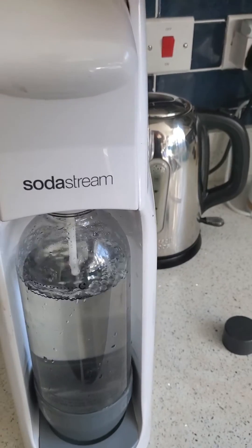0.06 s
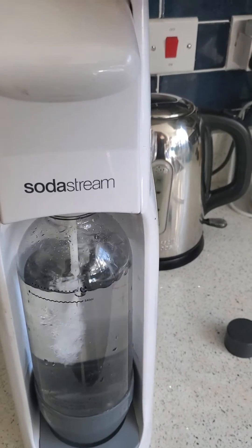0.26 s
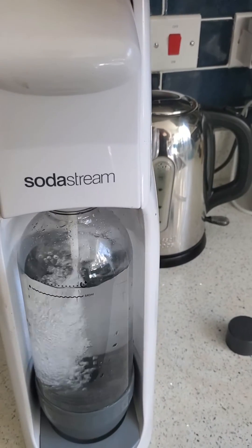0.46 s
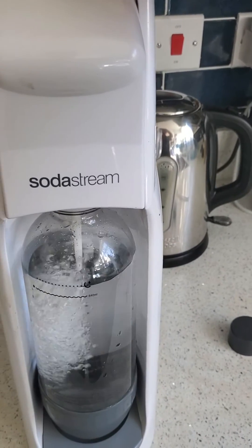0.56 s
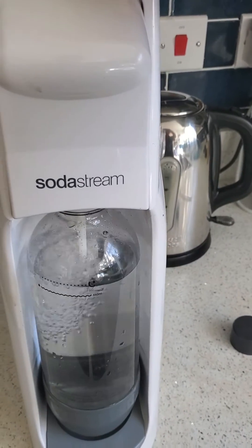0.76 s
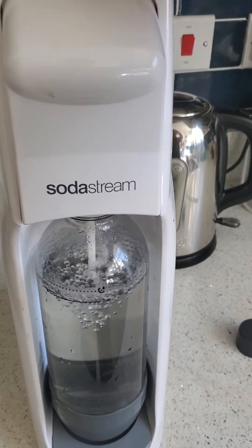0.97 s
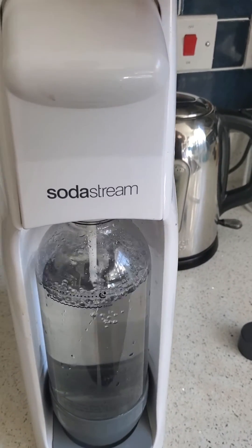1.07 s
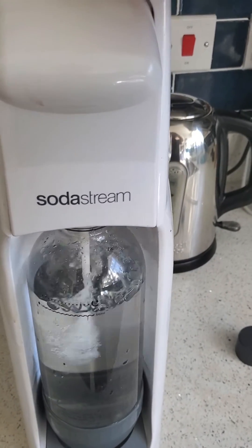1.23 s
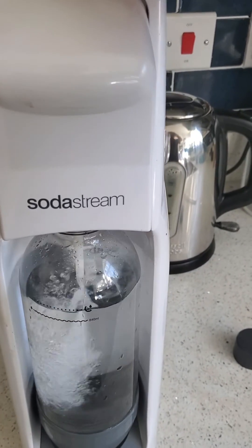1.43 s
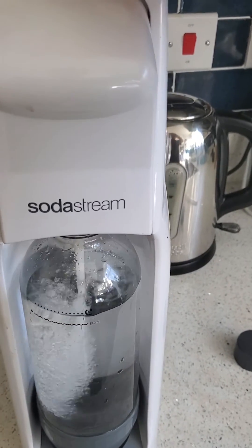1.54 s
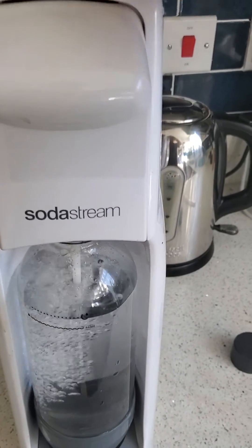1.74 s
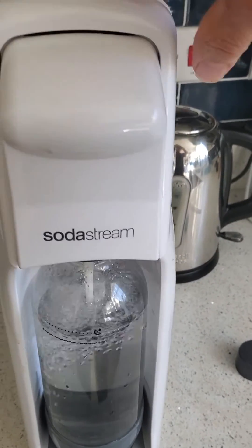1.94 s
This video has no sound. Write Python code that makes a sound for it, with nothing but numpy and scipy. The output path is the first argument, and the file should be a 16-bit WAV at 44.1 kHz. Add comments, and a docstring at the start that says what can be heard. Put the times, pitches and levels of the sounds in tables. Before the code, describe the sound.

Home soda maker blasts gas into a water bottle in two short, harsh, bubbling, squealing hisses

```python
"""In a small tiled kitchen, close by, a home soda maker is pressed twice.
Shaped noise hisses from the nozzle; swarms of short decaying rings make a bubble cloud that rings the bottle.
Gliding sines sing as big bubbles, a rough tube note and brief whistles of the jet.
Filtered noise clicks for button and valve; a spring pings and the hand thumps.
Froth and a low rocking hum stir in the water, gas glugs up through it, and faint room tone lies beneath."""
import sys
import numpy as np
from scipy import signal
from scipy.fft import rfft, irfft, next_fast_len
from scipy.io import wavfile
from scipy.ndimage import uniform_filter1d

SR = 44100
rng = np.random.default_rng(int(sys.argv[2]) if len(sys.argv) > 2 else 0)


def store_wav(level_fs):
    """Save 16-bit WAV to argv[1]."""
    pcm = np.round(np.clip(np.atleast_2d(level_fs), -1, 1) * 32767)
    wavfile.write(sys.argv[1], SR, pcm.T.astype(np.int16))


N = 88200
FILTER_SIZE = 16384
T = np.arange(N) / SR
HZ = np.maximum(np.arange(FILTER_SIZE // 2 + 1) * SR / FILTER_SIZE, 1)  # filter frequency grid
FULL_HZ = np.arange(N // 2 + 1) * SR / N  # frequency grid of the whole sound

CHURN_PER_S = 130  # speed of the gusts in hiss and cloud
RIGHT_LAG_S = .00007  # the direct sound reaches the right ear this much later

# stirred water in the bottle: t/s, low rocking level/dB, froth level/dB
WATER = [(0, -75.5, -63), (.06, -54.5, -63), (.14, -63, -73.5), (.21, -66.5, -101.5), (.4, -62.5, -51.5),
         (.57, -70, -56.5), (.63, -53, -46), (.72, -64, -64.5), (.8, -50.5, -47), (.88, -71.5, -75.5),
         (.96, -79, -72), (1.01, -61, -68.5), (1.08, -60, -58.5), (1.17, -76, -74), (1.3, -55.5, -46.5),
         (1.7, -64.5, -62), (1.79, -61.5, -42), (1.86, -55.5, -55), (1.92, -52.5, -50.5), (2, -53.5, -57)]
# modes of the froth and head space: f/Hz, width/Hz, level/dB
FROTH_MODES = [(200, 23, -5), (311.2, 17.8, 3.5), (414, 57, -4), (560.6, 55, 2.5), (1060, 420, -10.5),
               (1600, 180, -14.5), (2060, 300, -22), (3800, 1000, -21.5)]


def undb(db):
    """Decibels to gain."""
    return 10 ** (np.asarray(db) / 20)


def unit(x):
    """Scale to rms 1."""
    return x / np.sqrt(np.mean(x ** 2) + 1e-20)


def noise():
    """White noise."""
    return rng.standard_normal(N)


def walk(rate):
    """Smooth random wander with rms 1, heading for a new value rate times a second."""
    k = max(int(SR / rate), 1)
    steps = noise()[np.arange(N) // k]
    return unit(uniform_filter1d(steps, k))


def curve(rows, axis=1):
    """Gain over time from a dB column; practically silent outside the rows."""
    rows = np.array(rows)
    return undb(np.interp(T, rows[:, 0], rows[:, axis], left=-150, right=-150))


def pan(db):
    """Gains of left and right for a left-minus-right difference in dB."""
    return undb(np.array([[.5], [-.5]]) * db)


def colour(points):
    """Gain over frequency from (f/Hz, level/dB) points."""
    hz, db = np.array(points).T
    return undb(np.interp(np.log(HZ), np.log(hz), db))


def band(lo_hz, hi_hz, order=4):
    """Gain of a band-pass."""
    low_side = 1 + (lo_hz / HZ) ** (2 * order)
    high_side = 1 + (HZ / hi_hz) ** (2 * order)
    return 1 / np.sqrt(low_side * high_side)


def modes(rows):
    """Gain of a set of resonances, their powers added."""
    power = 0
    for hz, width, db in rows:
        detune = (HZ ** 2 - hz ** 2) / (HZ * width)
        power = power + undb(db) ** 2 / (1 + detune ** 2)
    return np.sqrt(power)


def convolve(x, response):
    """Pass a sound through an impulse response."""
    size = next_fast_len(N + len(response), True)
    return irfft(rfft(x, size) * rfft(response, size), size)[..., :N]


def shape(x, gain):
    """Causal (minimum-phase) filter with the given gain over frequency."""
    cepstrum = irfft(np.log(gain + 1e-6))
    cepstrum[1:FILTER_SIZE // 2] *= 2
    cepstrum[FILTER_SIZE // 2 + 1:] = 0
    return convolve(x, irfft(np.exp(rfft(cepstrum)))[:FILTER_SIZE // 2])


def split(x, edges):
    """Cut a sound into neighbouring frequency bands."""
    spectrum = rfft(x)
    return [irfft(spectrum * ((FULL_HZ >= lo) & (FULL_HZ < hi)), N) for lo, hi in zip(edges, edges[1:])]


def fade(age, t60):
    """Exponential ring-down that starts at age 0."""
    return (age >= 0) * np.exp(-np.log(1000) * np.clip(age / t60, 0, 10))


def swarm(span_hz, rate, cycles, size=256):
    """An even stream of bubbles, each a short ring of its own pitch and strength, cut after size samples."""
    size_spread_db = 4.5
    when, pitch, chance = rng.random((int(rate * N / SR), 3)).T[..., None]
    hz = span_hz[0] + pitch * (span_hz[1] - span_hz[0])
    age = T[:size]
    # a few bubbles are much stronger than the rest; higher ones are louder too
    strength = undb(size_spread_db * np.minimum(-np.log(1 - chance), 3)) * hz
    rings = strength * fade(age, cycles / hz) * np.sin(2 * np.pi * hz * age)
    places = (when * N).astype(int) + np.arange(size)
    return unit(np.bincount(places.ravel(), rings.ravel(), N)[:N])


def gulp(s, hz, rise_s, t60, glide):
    """Envelope and tone of a soft low ring that sags in pitch."""
    age = np.maximum(T - s, 0)
    swell = 2 * (1 - np.exp(-age / rise_s)) * fade(age, t60)
    cycles = hz * np.cumsum((age > 0) * np.exp(glide * age)) / SR
    return swell, np.sin(2 * np.pi * cycles)


def room_tone():
    """A faint, mostly low noise bed, partly shared by the two ears."""
    # f/Hz, level/dB
    tone_colour = [(20, -2), (60, -1), (150, -5.5), (500, -12.5), (2000, -36), (6000, -27.5),
                   (16000, -42.5)]
    level_db = -69
    air = noise() + .9 * np.array([noise(), noise()])
    return unit(shape(air, colour(tone_colour))) * undb(level_db)


def froth():
    """Bubbles burst at the surface under the neck of the bottle."""
    bursts = swarm((150, 4000), rate=1300, cycles=6.4)
    return unit(shape(bursts, modes(FROTH_MODES))) * curve(WATER, axis=2)


def rocking():
    """The stirred water rocks the bottle with a low hum: noise through a few narrow resonances."""
    # f/Hz, width/Hz, level/dB
    rocking_modes = [(72, 3.7, -3.5), (98.82, 15, -0.5), (188, 21, -4)]
    hum = signal.hilbert(shape(noise(), modes(rocking_modes) * band(56, 270)))
    steadier = hum.real / np.sqrt(np.abs(hum))  # halves the hum's level swings in dB
    return shape(unit(steadier) * curve(WATER), band(50, 400))


def pings():
    """The spring under the button rings briefly as the hand lands on it: decaying sines."""
    # t/s, level/dB
    ping_events = [(.038, -47), (.074, -66), (.97, -53.5)]
    # modes of the spring: f/Hz, level/dB, t60/s
    spring = [(1934, -3, 0.1), (3830, -11.5, .07), (4300, -4.5, 0.066)]
    ring = sum(undb(db) * fade(T, t60) * np.sin(2 * np.pi * hz * T) for hz, db, t60 in spring)
    return sum(undb(db) * np.interp(T - s, T, ring, left=0) for s, db in ping_events)


def clicks(snap_share=0.75):
    """Button and valve: short rattles with a dull body, a plastic clack and a quicker bright snap."""
    # t/s, body level/dB, clack level/dB, snap level/dB, t60 of body and clack/s
    click_events = [(0.04, -45.5, -50, -71, 0.03), (0.072, -52, -51.5, -86, 0.028),
                    (0.728, -48.5, -78.5, -82, 0.035), (0.775, -61, -36, -59, 0.05),
                    (0.794, -52.5, -36, -40.5, 0.043), (0.969, -57.5, -61, -71.5, 0.05),
                    (1.044, -54.5, -62, -74.5, 0.043), (1.056, -59, -46.5, -64.5, 0.1086),
                    (1.716, -70, -47, -30, 0.0092), (1.75, -36.5, -38, -48, 0.056),
                    (1.7591, -35, -17, -33, 0.01716), (1.8423, -61.5, -41, -44, 0.024),
                    (1.8843, -38, -38, -48.5, 0.075), (1.915, -35.5, -36, -57, 0.036)]
    # ring of the plastic housing: f/Hz, width/Hz, level/dB
    housing = [(1130, 96, -6), (1536, 210, 4), (1985, 110, -4), (2868, 960, -13), (3860, 530, 5),
               (4640, 780, -4.5), (4898, 410, -9)]
    body = unit(shape(noise(), modes(FROTH_MODES) * band(290, 900)))
    clack = unit(shape(noise(), modes(housing) * band(900, 5900)))
    snap = unit(shape(noise(), band(5000, 17000)))
    out = 0
    for s, body_db, clack_db, snap_db, t60 in click_events:
        out = out + fade(T - s, t60) * (undb(body_db) * body + undb(clack_db) * clack)
        out = out + fade(T - s, t60 * snap_share) * undb(snap_db) * snap
    return out


def thumps():
    """The hand shoves the machine against the worktop: dull low rings that sag in pitch."""
    # t/s, f/Hz, level/dB
    thump_events = [(0.044, 190.4, -49), (0.058, 101.6, -54), (.6, 99, -57), (0.986, 100.6, -49)]
    out = 0
    for s, hz, db in thump_events:
        swell, ring = gulp(s, hz, rise_s=0.0133, t60=0.2, glide=-0.91)
        out = out + undb(db) * swell * ring
    return out


def hiss():
    """Gas rushing through the nozzle; each part of its spectrum swells a little on its own."""
    # one curve per burst: t/s, level/dB
    hiss_levels = [
        [(.214, -97), (.227, -50.5), (.28, -42.5), (.36, -43.5), (.44, -42.5), (.56, -47), (.65, -57),
         (.73, -104)],
        [(1.188, -88.5), (1.2, -51), (1.22, -46), (1.37, -42), (1.45, -42.5), (1.62, -47.5), (1.69, -60.5),
         (1.75, -62)],
    ]
    # f/Hz, level/dB
    hiss_colour = [(100, -37), (300, -2), (600, 6.5), (1000, -1), (5000, -8), (6100, -6.5), (6500, -4.5),
                   (7200, -6), (8500, 1), (9250, 6), (9800, -1.5), (10700, -3.5), (11900, 10), (13200, -8),
                   (14200, -5.5), (15500, -8)]
    # stereo place: f/Hz, left minus right/dB
    hiss_pan = [(300, -7), (1000, 7.5), (5800, 28.5), (7000, 13), (8800, 4.5), (9400, 11), (10800, 3),
                (11900, 1.5), (13600, 9.5), (15500, 4.5)]
    shift_db, shift_per_s, flutter_db = 2, 22, 1.55
    parts = split(noise(), (20, 2500, 5000, 8000, 10700, 13000, 20000))
    rush = sum(part * undb(shift_db * walk(shift_per_s)) for part in parts)
    jet = unit(shape(rush, colour(hiss_colour))) * sum(curve(c) for c in hiss_levels)
    jet = jet * undb(flutter_db * walk(CHURN_PER_S))
    return np.array([shape(jet, colour(hiss_pan) ** side) for side in (.5, -.5)])


def cloud():
    """Large and small bubbles tear off in uneven gusts, each size swelling on its own, and ring the bottle."""
    # one curve per burst: t/s, large bubble level/dB, small bubble level/dB
    cloud_levels = [
        [(.214, -77, -66), (.228, -42.5, -48), (.255, -36.5, -31), (.285, -29, -28.5), (.35, -34, -29),
         (.415, -30.5, -28.5), (.45, -33, -29.5), (.5, -40, -34.5), (.57, -41, -38), (.61, -39.5, -37),
         (.67, -41.5, -47.5), (.71, -71.5, -69.5)],
        [(1.188, -76.5, -67.5), (1.198, -50.5, -56.5), (1.212, -41.5, -39), (1.219, -37.5, -32.5),
         (1.32, -37.5, -38.5), (1.365, -35.5, -29), (1.41, -33.5, -29.5), (1.47, -36, -30), (1.5, -36, -30),
         (1.53, -39.5, -29.5), (1.57, -39, -33), (1.61, -44, -41.5), (1.635, -39, -35), (1.68, -37, -32),
         (1.72, -39, -44), (1.75, -48, -65)],
    ]
    # resonances of the filled bottle: f/Hz, width/Hz, level/dB, left minus right/dB
    bottle = [(296.4, 30, -13.5, 1), (584, 41.5, -4, 5), (1356, 160, -5.5, 16), (1668.5, 138, -4, -18.5),
              (2036, 76, -0.5, -2.5), (2176, 250, -1, -2.5), (2690, 280, -4.5, 5.5), (3256, 370, -4.5, 0),
              (3370, 360, -13, -7), (3714, 240, 2, -7), (4200, 330, -7.5, 2.5), (4580, 180, -7.5, 2),
              (5221, 270, -4.5, 2), (5500, 300, -17, -0.5)]
    large_hz, small_hz = (288, 2359), (2360, 5682)
    churn_db, patch_db, patch_per_s = 1.27, 2, 55  # shared gusts, then swells of each size
    gains = []
    for side in (.5, -.5):
        ear_modes = [(hz, width, db + side * pan_db) for hz, width, db, pan_db in bottle]
        gains.append(modes(ear_modes) * band(200, 5800))
    churn = churn_db * walk(CHURN_PER_S)
    out = 0
    for column, span in enumerate((large_hz, small_hz), start=1):
        bubbles = swarm(span, rate=2600, cycles=7.9)
        sizes = split(bubbles, np.linspace(*span, 5))
        stream = sum(part * undb(churn + patch_db * walk(patch_per_s)) for part in sizes)
        rung = unit(np.array([shape(stream, gain) for gain in gains]))
        out = out + rung * sum(curve(c, axis=column) for c in cloud_levels)
    return out


def notes(waver, pan_db=-3):
    """Single big bubbles sing out of the cloud: sines that swell, glide and die away."""
    # t/s, length/s, starting f/Hz, pitch change/share, level/dB
    note_events = [(0.219, 0.03, 1853, -0.2, -39), (.222, 0.034, 816, 0.044, -44),
                   (0.224, 0.03358, 4053, 0.079, -28), (0.28, 0.0169, 1888, 0.022, -25.5),
                   (0.311, 0.0066, 1610, 0, -31), (0.359, 0.012, 2020, 0.015, -27.5),
                   (0.384, 0.035, 2760, 0, -24.5), (.421, 0.0127, 2093, -0.06, -21.5),
                   (.422, 0.0069, 2900, -0.051, -19.5), (0.519, 0.024, 2810, 0.0015, -34),
                   (1.196, 0.027, 794.6, 0.017, -49), (1.197, 0.0104, 2083, -0.153, -40.5),
                   (1.207, 0.0274, 1443, -.1, -34.5), (1.26, 0.0247, 1370, -0.0077, -36),
                   (1.287, 0.016, 1972, -0.052, -26.5), (1.387, 0.058, 2694, 0.11, -26.5),
                   (1.506, 0.0473, 3134, 0.051, -30.5), (1.511, 0.031, 3540, .03, -31),
                   (1.625, 0.02, 2170, -0.095, -33), (1.675, 0.036, 3250, -0.077, -35.5)]
    out = np.zeros(N)
    wander = 1 + waver * walk(300)
    for s, length, hz, glide, db in note_events:
        on = (T >= s) & (T < s + length)
        u = (T[on] - s) / length
        pitch = hz * (1 + glide * u) * wander[on]
        swell = np.sin(np.pi * u) * np.sqrt(2)
        out[on] += undb(db) * swell * np.sin(2 * np.pi * np.cumsum(pitch) / SR)
    return out * pan(pan_db)


def tube():
    """The flow keeps the nozzle tube singing on one note, roughened by fast pitch wander."""
    # one curve per burst: t/s, level/dB
    tube_levels = [
        [(.26, -49.5), (.34, -35), (.42, -33.5), (.52, -53), (.62, -48), (.69, -66)],
        [(1.195, -48), (1.225, -36), (1.32, -31), (1.41, -34), (1.5, -40), (1.56, -32.5), (1.6, -43)],
    ]
    tube_hz, waver_share, pan_db = 3845, 0.02115, -8
    pitch = tube_hz * (1 + waver_share * walk(500))
    note = unit(np.sin(2 * np.pi * np.cumsum(pitch) / SR))
    return note * sum(curve(c) for c in tube_levels) * pan(pan_db)


def whistle():
    """The jet locks on to a high resonance and squeals: a gliding, slightly wavering sine."""
    # one curve per squeal: t/s, f/Hz, level/dB
    squeals = [
        [(.302, 4690, -48), (.31, 4575, -22), (.333, 4590, -19), (.343, 4480, -11), (.354, 4479, -19.5),
         (.359, 4532, -28), (.367, 4555, -11.5), (.378, 4570, -29), (.395, 4520, -45.5), (.408, 4510, -54.5),
         (.438, 4540, -38), (.455, 4500, -49)],
        [(1.328, 4630, -29), (1.342, 4590, -20), (1.354, 4600, -29.5), (1.4, 4460, -54)],
        [(1.54, 4560, -63), (1.558, 4540, -18.5), (1.572, 4870, -70.5)],
    ]
    waver_share, pan_db = .0035, 2
    out = 0
    for rows in squeals:
        s, hz, _ = np.array(rows).T
        pitch = np.interp(T, s, hz) * (1 + waver_share * walk(250))
        out = out + unit(np.sin(2 * np.pi * np.cumsum(pitch) / SR)) * curve(rows, axis=2)
    return out * pan(pan_db)


def glugs():
    """Gulps of gas break the surface: low rings that sag in pitch, with a splash of noise around each."""
    # t/s, f/Hz, level/dB
    glug_events = [(.497, 305, -45), (0.726, 333.7, -49), (.755, 321, -50), (0.766, 206, -55),
                   (1.065, 585, -44), (1.341, 518, -31.5), (1.343, 323.5, -32.5), (1.354, 203, -41.5),
                   (1.378, 320, -39), (1.758, 564, -32.5), (1.778, 552, -37), (1.811, 422, -37),
                   (1.873, 322, -39), (1.875, 546, -34.5), (1.908, 322, -39.5), (1.953, 318, -43),
                   (1.988, 473, -42)]
    splash_share = 0.46
    splash = unit(shape(noise(), modes(FROTH_MODES)))
    out = 0
    for s, hz, db in glug_events:
        swell, ring = gulp(s, hz, rise_s=0.00251, t60=0.06555, glide=-.8)
        out = out + undb(db) * swell * (ring + splash_share * splash)
    return out


def kitchen(x, size=24000):
    """Quick echoes off the housing, worktop and wall, then a short tiled tail, different at each ear."""
    # first echoes: delay at left ear/s, delay at right ear/s, level/dB
    echoes = [(.00105, 0.00173, -11.5), (.0029, 0.0028, -8.5), (.0052, .0061, -21.5)]
    early_db, early_t60_s = -2.5, 0.047
    tail_db, tail_t60_s, treble_t60_s = -8, 0.303, 0.27
    out, age = [], T[:size]
    for ear, lag in enumerate((0, RIGHT_LAG_S)):
        paths = [(lag, 0)] + [(row[ear], row[2]) for row in echoes]
        delays = sum(undb(db) * np.exp(-2j * np.pi * FULL_HZ * delay) for delay, db in paths)
        ending = np.clip((T[-1] - T) / .007, 0, 1)  # keeps late sound from wrapping to the start
        first = irfft(rfft(x[ear] * ending) * delays, N)
        early = shape(noise(), band(720, 24000))[:size] * fade(age, early_t60_s) * (age > .002)
        tail = shape(noise(), band(140, 4500))[:size] * fade(age, tail_t60_s)
        treble = shape(noise(), band(5600, 14000))[:size] * fade(age, treble_t60_s)
        late = (tail + treble) * (age > .008)
        response = undb(early_db) * unit(early) + undb(tail_db) * unit(late)
        out.append(first + convolve(x[ear], response / np.sqrt(size)))
    return np.array(out)


def scene():
    """The machine in its kitchen over room tone; glugs, whistles and notes go only partly through the room."""
    room_share = 0.66
    near = glugs() + whistle() + notes(waver=.022)
    straight = np.array([near[0], np.interp(T - RIGHT_LAG_S, T, near[1])])
    machine = froth() + pings() + clicks() + hiss() + cloud() + tube()
    in_room = kitchen(machine + room_share * near)
    return in_room + (1 - room_share) * straight + rocking() + thumps() + room_tone()


def record(dry):
    """A steep elliptic low-pass takes off the top above 16 kHz."""
    return signal.sosfilt(signal.ellip(10, .2, 80, 16000, fs=SR, output="sos"), dry)


dry = scene()
out = record(dry)
store_wav(out)
```